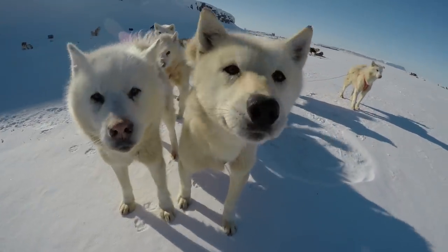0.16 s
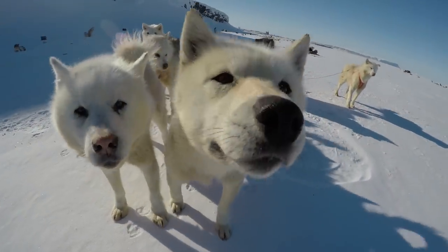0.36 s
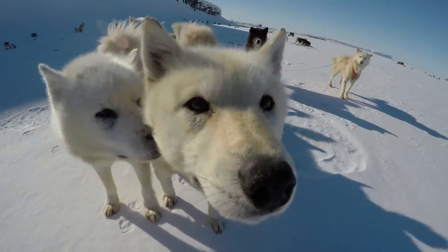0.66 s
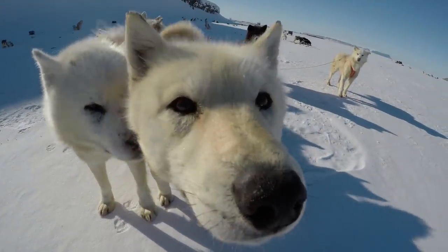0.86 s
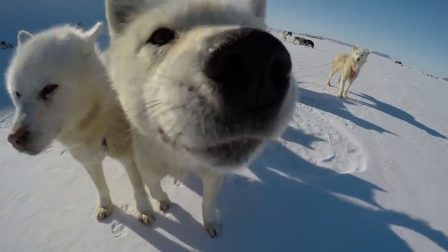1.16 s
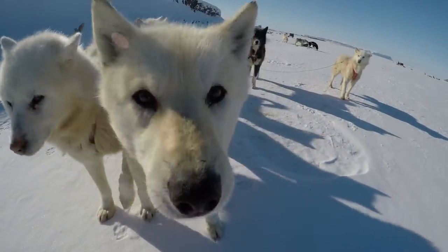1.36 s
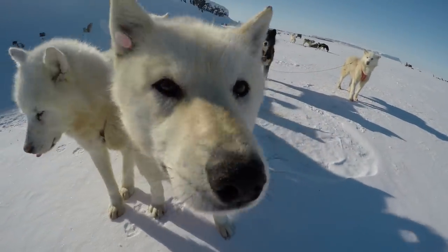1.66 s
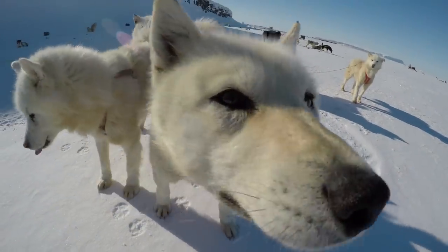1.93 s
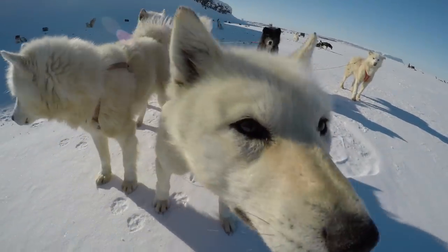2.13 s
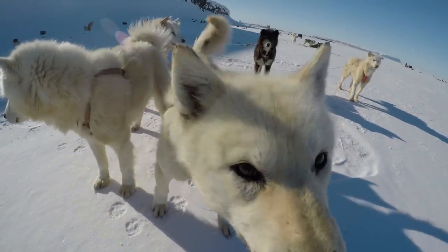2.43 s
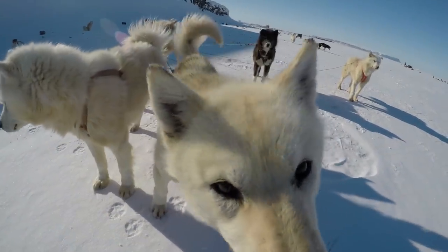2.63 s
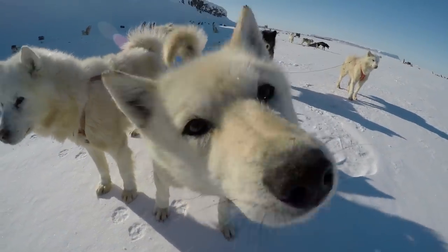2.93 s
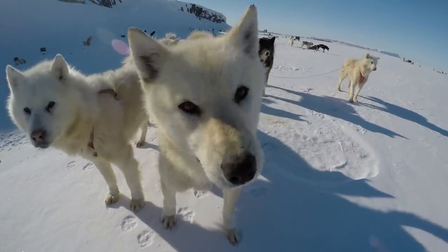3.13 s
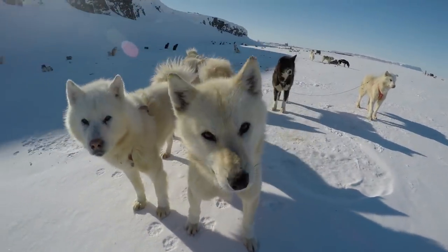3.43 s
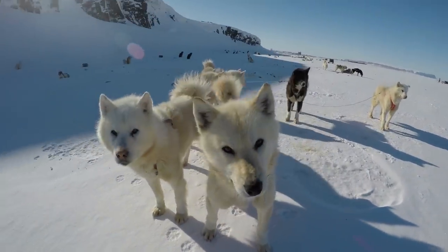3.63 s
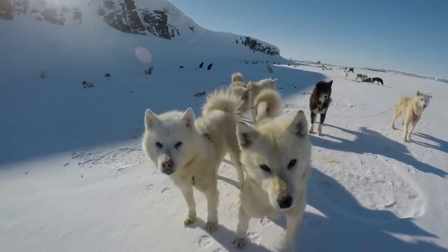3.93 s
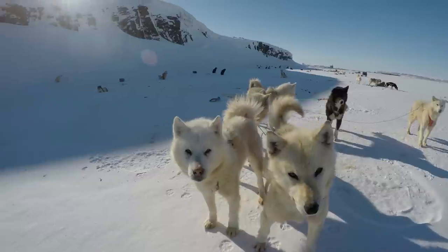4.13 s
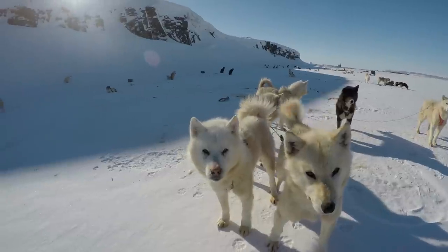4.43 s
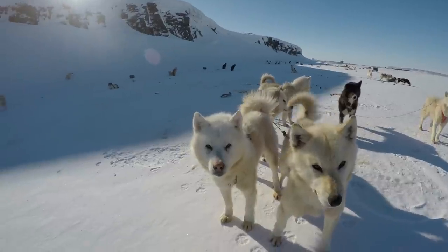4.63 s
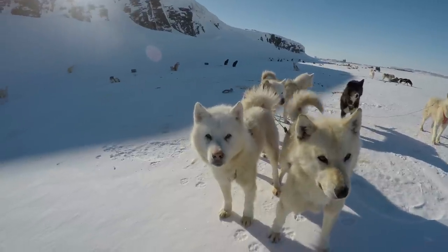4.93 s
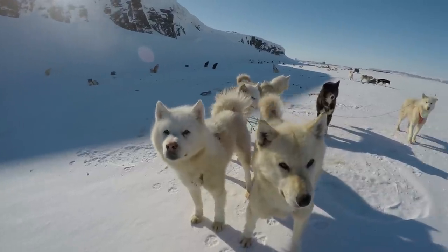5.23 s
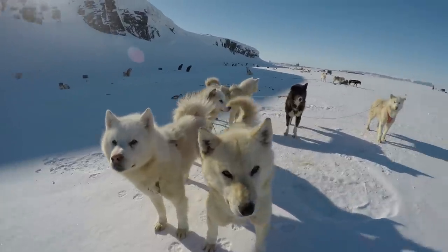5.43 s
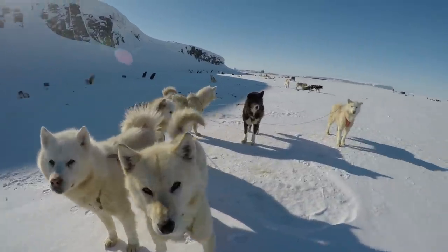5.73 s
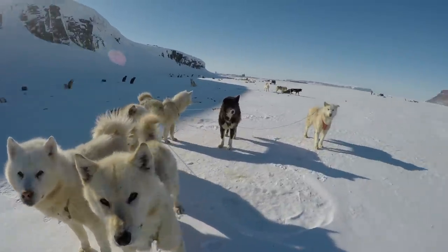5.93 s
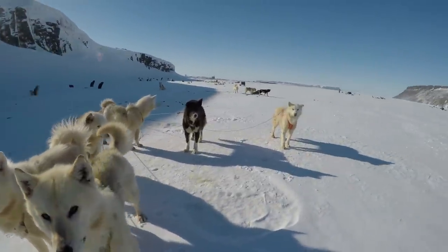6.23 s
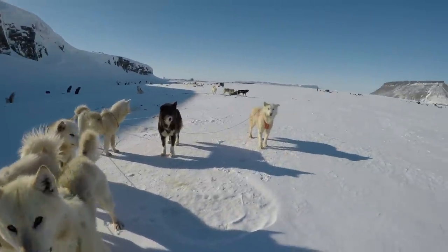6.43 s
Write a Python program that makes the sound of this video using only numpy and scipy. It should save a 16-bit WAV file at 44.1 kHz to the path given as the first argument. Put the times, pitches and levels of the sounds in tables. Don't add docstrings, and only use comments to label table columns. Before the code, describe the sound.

Outdoors on snowy ice, a dog gives clear whining calls and panting puffs while a handheld pole is bumped, knocked and creaks.

```python
import sys
import numpy as np
from scipy import signal
from scipy.fft import rfft, irfft
from scipy.io import wavfile
from scipy.ndimage import uniform_filter1d

SR = 44100
rng = np.random.default_rng(int(sys.argv[2]) if len(sys.argv) > 2 else 0)


def volts_from_db(level):
    exponent = np.asarray(level, float) / 20
    return 10 ** exponent


def generate_wav(sig):
    pcm = np.round(np.clip(np.atleast_2d(sig).T, -1, 1) * 32767).astype(np.int16)
    wavfile.write(sys.argv[1], SR, pcm)


N = 290619
T = np.arange(N) / SR

# time_s, pitch_hz, fundamental_db, overtones_db
CALL_TAIL = [(0.0, 1076, -44, -47), (0.02, 780, -44, -51), (0.04, 635, -40, -49)]
WHINE_1 = [(0.561, 950, -54.5, -75), (0.581, 1146, -29.5, -49.5), (0.627, 1334, -20, -42),
           (0.729, 1290, -22.5, -48), (0.83, 1415, -18, -40.5), (0.93, 1394, -18.5, -39.5),
           (1, 1380, -16.5, -41), (1.06, 1331, -20, -45), (1.077, 1216, -28, -52.5)]
YELP = [(1.272, 430.4, -45, -48), (1.305, 510.3, -31, -48.5), (1.332, 600, -42, -39.5),
        (1.352, 933, -36.5, -49.5), (1.401, 889.7, -40.5, -61.5), (1.421, 614.5, -42.5, -46.5),
        (1.45, 447, -45, -55), (1.58, 300, -51, -62)]
WHINE_2 = [(4.71, 759, -54, -72), (4.75, 1183, -28, -43.5), (4.775, 1248, -21, -52),
           (4.8, 1320, -21.5, -53), (4.9, 1332, -27, -58), (4.98, 1449, -22.5, -57.5),
           (5.15, 1429, -28.5, -57.5), (5.19, 1386, -35.5, -56), (5.25, 1363, -35, -53.5)]
WHINE_3 = [(5.454, 603, -67, -59), (5.495, 1048, -39, -64), (5.52, 1246, -28, -56),
           (5.551, 1346, -27, -55.5), (5.644, 1284, -33.5, -59.5), (5.72, 1375, -22, -56),
           (5.848, 1378, -21.5, -52), (5.961, 1180, -38.5, -57.5), (5.978, 1021, -47, -50)]
WHINE_4 = [(6.209, 553, -54, -63), (6.25, 900.2, -49, -50.5), (6.271, 1106, -50.5, -46),
           (6.301, 1213, -45.5, -37), (6.329, 1157, -53, -47.5), (6.4, 1026, -54, -56),
           (6.48, 1103, -39.5, -49), (6.555, 1191, -33, -50), (6.588, 1151, -33.5, -46)]
CALLER = [
    1,
    0,
    1,
    0,
    0,
    1,
]
# partial_2_db, partial_3_db, partial_4_db, higher_partials_db, breath_db
CALL_COLOURS = [
    (-1.5, -22, -6, -4, 3.5),
    (2.5, 2, -0.5, -7, -4),
    (1.5, -3.5, -2.5, -10.5, 1.5),
    (0, 6, 4.5, 2, -16.5),
    (-2, -1, 1, -4.5, -4.5),
    (3, -3, -4.5, -5, -6.5),
]
# length_s, fundamental_db, overtones_db, end_pitch_share, fade_db
VOICE_BREAKS = [
    (.03, -45, -47, .25, 2),
    (.03, -46.5, -63, .42, -1.5),
    (.04, -49, -50.5, .3, -3),
]
# centre_s, half_width_s, roughness (0-1)
FLUTTER = [(1.092, .02, .25), (1.335, .024, .55), (1.45, .03, .1), (1.5, .09, .07), (4.73, .04, .08),
           (5.268, .028, .3), (5.47, .035, .06), (5.61, .06, .025), (6.008, .03, .55), (6.222, .04, .28)]
# centre_s, half_width_s, level_db
SWELLS = [(0.655, .03, 1.5), (0.72, .045, -2.5), (0.775, .03, 2), (4.86, .04, -2), (5.005, .03, 1),
          (5.068, .025, -4), (5.1, .03, 1), (5.205, .025, -2), (5.275, .008, 5), (5.605, .03, -3),
          (5.77, .04, 1), (5.9, .03, -3), (5.986, .008, 9.5), (6.001, 0.011, -12), (1.328, 0.014, -5),
          (1.074, .01, 3), (1.088, .006, -8), (6.29, .012, -7), (6.335, .012, -9), (6.52, .04, 2.5)]
# centre_s, half_width_s, level_db
TONGUE_SHIFTS = [
    [(0.70, 0.072, -4.5), (1.32, .022, 6), (1.37, .03, 3), (1.41, 0.014, 5), (1.49, 0.061, -6),
     (4.86, .05, -8), (4.95, .06, -4), (5.06, 0.026, -12), (5.22, 0.016, -3), (5.475, .02, 7.5),
     (5.54, 0.026, -12), (5.575, .03, -6), (5.63, 0.026, -9.5), (5.70, 0.042, -7.5), (5.983, 0.0078, 6.5),
     (6.345, 0.02, -9), (6.52, 0.1, -2), (6.235, .015, 2), (6.3, .03, 3), (6.41, 0.057, 4),
     (6.58, 0.031, -9)],
    [(0.68, 0.16, -10), (1.341, .016, 9), (1.375, 0.028, -12), (1.43, .02, 6.5), (4.77, 0.025, 6),
     (4.86, .05, -1), (5.47, 0.044, -21), (5.55, .03, -9), (5.68, 0.048, 7.5), (5.965, 0.04, -14.5),
     (5.996, .008, 11), (6.3, 0.056, -13), (6.41, 0.046, -11), (6.53, 0.074, 10)],
    [(0.6, .03, 6.5), (0.93, .1, 0), (1.28, 0.022, -14.5), (1.375, 0.024, 5), (1.3, .015, 8),
     (1.43, .02, 5), (1.505, .035, -8), (1.46, .025, 3), (4.76, 0.013, 5.5), (4.80, 0.033, -16),
     (5.235, .035, -13), (5.465, .02, -15), (5.56, 0.049, 8.5), (5.84, 0.052, -18), (5.96, 0.029, 7),
     (5.987, 0.013, -17), (6.005, .012, 10), (6.31, .04, 1.5), (6.405, 0.046, -17), (6.53, .06, 6)],
    [(0.62, 0.042, 6.5), (0.9, 0.26, -8.5), (1.375, .035, 19), (1.46, .035, 5), (4.83, 0.12, 13.5),
     (5.47, 0.029, -10), (5.925, .03, 0), (6.01, 0.023, 10), (6.31, 0.041, 12), (6.41, 0.065, -9),
     (6.545, .055, 13)],
    [(0.74, 0.11, 10), (0.9, 0.085, -7), (1.03, 0.047, 7.5), (6.015, 0.021, 14.5), (6.3, 0.069, -14),
     (6.41, 0.043, 9), (6.54, .07, -14)],
]
# frequency_hz, level_db
MOUTH = [(1000, -1), (1600, 11.5), (2700, -1.5), (3900, -4.5), (4250, -4.5), (5200, -7.5), (6300, -20),
         (8200, -28)]
PORT_LEAD = [
    (0.86, -1.5, .1, 2.1),
    (-1, 4, -1.7, 2.4),
]
# partial_1_db, partial_2_db, partial_3_db, partial_4_db
PORT_PAN = [
    (8, 4, 5.7, 1),
    (12, 8.2, 15, 11),
]
# centre_s, half_width_s, lead_rad, pan_db
HEAD_TURN = (4.5, -0.5, 0.5, -1)

# delay_s, level_db
CLIFF_FACES = [(0.076, -26.5), (0.117, -28), (.15, -29.5), (.18, -34)]
# time_s, level_db
FACING = [(0, -2.5), (1.2, -9), (1.5, -7), (4.85, -12), (5.1, 1.5), (5.3, 9), (5.58, 9), (5.8, -6),
          (6.1, -1), (6.5, 7.5)]

# start_s, length_s, first_hz, last_hz, peak_db
WHISTLES = [(0.031, 0.016, 4850, 4850, -36), (0.033, 0.053, 4150, 4410, -42.5),
            (0.058, 0.055, 4900, 4960, -54), (0.539, 0.021, 4360, 4350, -48),
            (1.086, 0.0297, 4430, 4630, -39.5), (1.175, .028, 600, 450, -45),
            (1.38, 0.0467, 479.7, 610, -38.5), (4.09, .045, 4300, 4330, -64),
            (4.435, .035, 4800, 4800, -53.5), (4.428, .03, 4060, 4150, -60), (5.558, .035, 880, 1025, -54),
            (5.601, .055, 1083, 1187, -47.5), (5.979, 0.017, 4360, 4850, -48),
            (6.027, 0.0149, 4850, 5000, -55)]
# time_s, pitch_hz, level_db
LONG_WHISTLE = [
    [(3.85, 4992, -67), (3.9, 4873, -67), (3.94, 4772, -63), (3.962, 4700, -50), (3.99, 4800, -67),
     (4.015, 4880, -68), (4.06, 4790, -70)],
    [(4.08, 4800, -66), (4.12, 4840, -67), (4.155, 4770, -56), (4.19, 4820, -67), (4.215, 4750, -62),
     (4.28, 4620, -58), (4.36, 4570, -62.5), (4.385, 4534, -44), (4.432, 4390, -54)],
]

# start_s, peak_s, end_s, hiss_db, throat_re_hiss_db
PANTS = [(0.01, 0.087, 0.2, -42.5, 5.5), (0.157, 0.246, 0.36, -47.5, -3), (1.07, 1.089, 1.164, -46, -9.5),
         (1.145, 1.18, 1.28, -40.5, -2.5), (1.294, 1.335, 1.546, -44.5, -0.5), (1.41, 1.483, 1.54, -44, -7),
         (1.625, 1.646, 1.75, -55.5, -2.5), (1.71, 1.834, 1.95, -53, 0.5), (1.988, 2.008, 2.1, -47.5, -7),
         (3.065, 3.095, 3.13, -55, -1.5), (3.16, 3.212, 3.26, -56.5, -4), (4.403, 4.41, 4.52, -66, 9.5),
         (4.662, 4.755, 4.895, -48, 0), (5.986, 6.018, 6.02, -47, 5), (6.205, 6.232, 6.27, -62, 4)]
# time_s, level_db
CHEST_HUM = [
    [(0.0, -46), (0.13, -46), (0.27, -44)],
]
# frequency_hz, width_hz, level_db
HISS = [(4480, 1400, 22.5), (2860, 640, 16.5), (7000, 5700, -22)]
THROAT = [(1720, 1400, 14.5), (2420, 1100, 9)]
CHEST = [(597, 100, 6), (1040, 1570, -8), (358, 110, 2.5)]
# frequency_hz, width_hz, level_db
SNORT = (4200, 5100, -48)

# time_s, peak_db
THUMPS = [(0.331, -28.5), (0.633, -32.5), (0.769, -38), (0.868, -40), (1.209, -33), (1.315, -36.5),
          (1.534, -29.5), (1.923, -30.5), (2.069, -37), (2.145, -32), (2.662, -41.5), (2.962, -35.5),
          (3.09, -40), (3.175, -35.5), (3.216, -44), (3.331, -39.5), (3.564, -37), (3.602, -36),
          (3.655, -34), (4.084, -36.5), (4.436, -30.5), (4.519, -28.5), (4.664, -34), (4.838, -34.5),
          (5.497, -26.5), (5.777, -30), (6.21, -40), (6.232, -44), (6.323, -40.5), (6.556, -26),
          (5.287, -33), (0.442, -46), (1.696, -45.5), (2.09, -43), (2.229, -45), (2.627, -45), (2.74, -46),
          (3.03, -45), (4.393, -43), (4.545, -38), (4.608, -47), (4.7, -40), (5.72, -43.5), (6.03, -45),
          (6.39, -45), (6.535, -39)]
# time_s, peak_db
TAPS = [(0.533, -35.5), (0.573, -35), (0.631, -26.5), (0.739, -41.5), (0.769, -41.5), (1.206, -28),
        (1.532, -28.5), (2.143, -27.5), (0.329, -22.5), (1.921, -40), (1.995, -44), (2.07, -45),
        (2.17, -42), (2.96, -44.5), (3.39, -46), (4.517, -40.5)]
# frequency_hz, level_db, t60_s
POLE_MODES = [(179, 20, 0.08), (132, -9.5, 0.069), (267, -10.5, 0.095), (555, -30.5, 0.11)]
GRIP_MODES = [(255.6, 9.5, 0.044), (218, 0, 0.067), (314, -8.5, 0.041), (545, -18.5, 0.03)]
KNOCK_MODES = [(172.3, 20, 0.095), (139, 13, 0.042), (264, -12, 0.079), (520, -21, 0.046)]
RAP_MODES = [(1080, 0, 0.017), (1570, -4, 0.013), (520, -2, .015), (2900, -18, 0.0077), (4600, -29, .006),
             (201, -5, .025)]

# time_s, peak_db, bright_re_peak_db
SLIPS = [(0.058, -36, -18), (0.15, -35, -21), (0.326, -39.5, -11), (0.529, -43, -18), (0.569, -41.5, -12),
         (0.627, -52.5, 0), (0.735, -52.5, -11), (0.767, -42, -11), (1.251, -39, -11.5),
         (1.767, -46, -11.5), (1.827, -43, -35), (2.141, -50, -8.5)]
# time_s, peak_db, bright_re_peak_db
CREAKS = [(3.247, -46.5, -22), (3.418, -41.5, -18), (3.517, -43.5, -10.5), (3.568, -41.5, -14.5),
          (3.652, -39.5, -43), (3.69, -54, -16), (3.719, -39, -42), (3.759, -39.5, -11.5), (3.793, -61, -3),
          (3.814, -37.5, -18), (3.846, -58, -5), (3.872, -40, -14), (3.902, -55, -2.5), (3.943, -40, -13.5),
          (3.978, -50.5, -7), (4.007, -51, -2.5), (4.043, -44.5, -8), (4.082, -49.5, -6.5),
          (4.142, -47.5, -13.5), (4.238, -38, -8.5), (4.661, -59, -15), (5.49, -41.5, -15),
          (5.772, -46.5, -12), (5.822, -57, -15), (6.552, -47.5, -20), (6.142, -50, -7), (6.228, -42, -8)]
# time_s, peak_db, pitch_hz
CRACKS = [(0.4678, -41.5, 4040), (0.5117, -42.5, 4570), (1.1725, -26.5, 3902), (1.481, -31.5, 5137),
          (1.642, -38, 5200), (1.735, -42.5, 4460), (1.8974, -45, 4730), (1.9969, -36, 4450),
          (2.946, -43, 5440), (3.064, -38, 5400), (3.0997, -47, 5460), (3.128, -34.5, 5395),
          (3.1496, -34, 4500), (3.46, -45, 3100), (4.4252, -50, 4570), (0.024, -35, 895),
          (0.058, -22.5, 620), (0.151, -26.5, 520), (0.698, -45.5, 4300), (0.748, -34, 4600),
          (3.0682, -38, 4485), (3.166, -45, 4200), (1.252, -35, 1120), (1.254, -42, 1750),
          (3.1295, -40, 5000), (3.093, -49, 4810), (3.203, -50, 3500), (3.212, -49, 4070),
          (5.496, -41, 802), (0.0235, -39, 1500)]
# time_s, level_db
TREMOR = [(0.0, -49.5), (0.3, -56), (0.6, -55.5), (1.3, -53), (1.7, -55.5), (2.3, -56.5), (2.68, -54.5),
          (3.1, -55), (3.54, -51.5), (3.9, -54), (4.3, -56.5), (4.55, -52.5), (4.99, -55), (5.6, -55.5),
          (5.9, -56.5), (6.17, -57.5), (6.4, -51), (6.59, -44)]

# frequency_hz, density_db (per Hz)
AIR_MID = [(12, -47.5), (20, -10), (43, -14.5), (87, -21.5), (188, -4.5), (235, -4), (420, -11.5),
           (636, -15), (1240, -19.5), (1380, -18.5), (2340, -23), (3170, -24.5), (8820, -28), (12000, -33),
           (14900, -46.5)]
AIR_SIDE = [(12, -71.5), (20, -33.5), (87, -38), (124, -16.5), (151, -4.5), (554, -8), (912, -7.5),
            (1020, -8), (4420, -33.5), (5510, -26.5), (9860, -30), (12600, -36.5), (14900, -47.5)]
# centre_s, half_width_s, level_db
LULL = (2.55, 0.53, -1.8)

STEADY_ROUGH, SLACK_ROUGH = .004, .07
SLACK_HZ, SLACK_SPAN_HZ = 1000, 700
SLACK_LOSS_DB = -34.5
BREATH_DB = -10
PATCHY_DB = 3.4
BREAK_KNEE, BREAK_KNEE_DROP = .3, .5
CLIFF_S, CLIFF_SPREAD_S, CLIFF_DB = .12, .05, -23
WHISTLE_EDGE_DB = -8.5
PANT_START_DB, PANT_END_DB = -9, -13
SNORT_S, SNORT_HALF_S = 4.755, 0.15
KNOCK_S, KNOCK_DB = 5.297, -11
RAP_S, RAP_DB = 5.2945, -7.5
TICK_HZ, TICK_CYCLES, TICK_WIDTH = 2800, 2.4, .9
SNAP_CYCLES, SNAP_WIDTH = 3.6, 0.47
AIR_DB, SIDE_DB = -54, -50.5
LOW_CUT_HZ, CUT_HZ = 138, 15080
LEAK_HZ, LEAK_DB = 70, -16.5


def set_level(x, db=0):
    return x * volts_from_db(db) / np.sqrt(np.mean(x ** 2))


def bump(centre_s, half_s):
    out = np.zeros(N)
    span = slice(*np.searchsorted(T, [centre_s - abs(half_s), centre_s + abs(half_s)]))
    out[span] = np.cos(np.pi / 2 * (T[span] - centre_s) / half_s) ** 2
    return out


def curve(points):
    return volts_from_db(np.interp(T, *np.transpose(points)))


def play(tables, edge_s=.008):
    s, *columns = np.concatenate([np.array(t, float) for t in tables]).T
    edge = int(edge_s * SR)
    is_open = sum(((T >= t[0][0]) & (T <= t[-1][0])) * 1. for t in tables).clip(0, 1)
    smooth = [uniform_filter1d(np.interp(T, s, c), edge) for c in columns]
    return smooth, uniform_filter1d(is_open, edge)


def walk(rate):
    hold = int(SR / rate)
    steps = np.repeat(rng.standard_normal(N // hold + 1), hold)
    return set_level(uniform_filter1d(uniform_filter1d(steps, hold), hold)[:N])


def band(x, hz, width):
    return signal.lfilter(*signal.iirpeak(hz, hz / width, SR), x)


def body(x, modes):
    return set_level(sum(volts_from_db(db) * band(band(x, hz, w), hz, w) for hz, w, db in modes))


def coloured(points):
    hz, db = np.transpose(points)
    f = np.maximum(np.fft.rfftfreq(N, 1 / SR), 1)
    gain = volts_from_db(np.interp(np.log(f), np.log(hz), db))
    return set_level(irfft(rfft(rng.standard_normal(N)) * gain, N))


def strike(seconds, gains, kernel):
    train = np.zeros(N)
    np.add.at(train, (np.asarray(seconds) * SR).astype(int).clip(0, N - 1), gains)
    return signal.fftconvolve(train, kernel / np.abs(kernel).max())[:N]


def mid_side(mid, side):
    return mid + side * np.array([[1], [-1]])


def ports(phase, rms_db, pan_db, lead):
    left, right = volts_from_db(pan_db / 2), volts_from_db(-pan_db / 2)
    mean = np.maximum(np.sqrt(left ** 2 + right ** 2 + 2 * np.cos(lead)) / 2, .3)
    waves = np.array([left * np.sin(phase + lead / 2), right * np.sin(phase - lead / 2)])
    return np.sqrt(2) * volts_from_db(rms_db) / mean * waves


def broken(call, length_s, db, over_db, end_pitch, fade_db):
    s, hz = call[-1][:2]
    knee_hz = (1 - BREAK_KNEE_DROP * (1 - end_pitch)) * hz
    return call + [(s + BREAK_KNEE * length_s, knee_hz, db, over_db),
                   (s + length_s, end_pitch * hz, db + fade_db, over_db + fade_db)]


def fold_roughness(hz):
    slack = ((SLACK_HZ - hz) / SLACK_SPAN_HZ).clip(0, 1)
    return STEADY_ROUGH + SLACK_ROUGH * slack + sum(r * bump(s, w) for s, w, r in FLUTTER)


def fold_phase(hz, rough):
    return 2 * np.pi * np.cumsum(hz * (1 + 0.3785 * rough * walk(500))) / SR


def breath(over_db, breath_db):
    noise = rng.standard_normal((2, N))
    air_flow = body(noise, HISS) + volts_from_db(2.5) * body(noise, THROAT)
    air_flow = volts_from_db(over_db + BREATH_DB + breath_db) * air_flow
    return mid_side(air_flow[0], .6 * air_flow[1])


def whines():
    whole = (WHINE_1, WHINE_2, WHINE_3)
    first, second, third = (broken(c, *b) for c, b in zip(whole, VOICE_BREAKS))
    calls = [CALL_TAIL, first, YELP, second, third, WHINE_4]
    (hz, first_db, over_db), gate = play(calls)
    call = (np.searchsorted([c[0][0] - .01 for c in calls], T) - 1).clip(0)
    dog = np.array(CALLER)[call]
    colour_db = np.transpose(CALL_COLOURS)[:, call]
    rough = fold_roughness(hz)
    hz = hz + (uniform_filter1d(hz, int(.035 * SR)) - hz) * np.exp(-rough / .015)
    phase = fold_phase(hz, rough)
    mouth_hz, mouth_db = np.transpose(MOUTH)
    turn = bump(*HEAD_TURN[:2])
    tongue_db = [sum(db * bump(s, w) for s, w, db in moves) for moves in TONGUE_SHIFTS]
    out = 0
    for k in range(7):
        shimmer_db = (.4 + 1.7 * min(k, 2)) * walk(35) + 8 * rough * walk(300) + .15 * walk(1000)
        lead, pan = (np.transpose(table)[min(k, 3)][dog] for table in (PORT_LEAD, PORT_PAN))
        if k:
            db = over_db + colour_db[min(k, 4) - 1] + tongue_db[min(k, 5) - 1]
            db = db + np.interp(np.log((k + 1) * hz), np.log(mouth_hz), mouth_db)
            db = db + SLACK_LOSS_DB * rough * (k - 1) + PATCHY_DB * walk(16)
        else:
            db = first_db + sum(swell * bump(s, w) for s, w, swell in SWELLS)
            lead = lead + HEAD_TURN[2] * turn
            pan = pan + HEAD_TURN[3] * turn
        out = out + ports((k + 1) * phase, db + shimmer_db, pan, lead)
    return (out + breath(over_db, colour_db[-1])) * gate


def cliff(voices, count=40):
    chance = rng.standard_normal((2, count, 2))
    dull = band(band(voices.mean(axis=0), 1400, 1800), 1400, 1800)
    out = []
    for c in chance:
        delays_s = np.abs(CLIFF_S + CLIFF_SPREAD_S * c[:, 0])
        facets = strike(delays_s, c[:, 1] / np.sqrt(count), np.ones(1))[:SR // 2]
        out.append(signal.fftconvolve(dull, facets)[:N])
    out = volts_from_db(CLIFF_DB) * np.array(out)
    for delay_s, db in CLIFF_FACES:
        late = np.interp(T - delay_s - .00015 * walk(70), T, dull, left=0)
        out = out + volts_from_db(db + 5.0 * np.array([walk(22), walk(12)])) * late
    return out * curve(FACING)


def whistles():
    short = []
    for s, length, a, b, db in WHISTLES:
        edge_db = db + WHISTLE_EDGE_DB
        short.append([(s, a, edge_db), (s + length / 2, (a + b) / 2, db), (s + length, b, edge_db)])
    wobble = 1 + .003 * walk(150)
    flicker_db = 1.5 * walk(60)
    out = 0
    for tables in (short[::2], sorted(short[1::2] + LONG_WHISTLE)):
        (hz, db), gate = play(tables)
        phase = 2 * np.pi * np.cumsum(hz * wobble) / SR
        out = out + gate * ports(phase, db + flicker_db, 3.0, .5)
    return out


def scuffing():
    puffs = [[(a, db + PANT_START_DB, throat), (peak, db, throat), (b, db + PANT_END_DB, throat)]
             for a, peak, b, db, throat in PANTS]
    (hiss_db, throat_db), gate = play(puffs, edge_s=.018)
    (chest_db,), hum = play(CHEST_HUM, edge_s=0.028)

    def grains():
        x = rng.standard_normal(N) * volts_from_db(2.2 * walk(400) + 1.2 * walk(60))
        puff = gate * volts_from_db(hiss_db) * (body(x, HISS) + volts_from_db(throat_db) * body(x, THROAT))
        return puff + hum * volts_from_db(chest_db) * body(x, CHEST)

    near, other = grains(), grains()
    return np.array([volts_from_db(.5) * near + .35 * other, volts_from_db(-.5) * np.roll(near, 2) - .35 * other])


def snort():
    hz, width, db = SNORT
    rough = rng.standard_normal((2, N)) * volts_from_db(1.2 * walk(120))
    x = set_level(band(body(rough, [(hz, width, 0)]), hz, width), db)
    return bump(SNORT_S, SNORT_HALF_S) * mid_side(x[0], .5 * x[1])


def rings(t, modes):
    return [volts_from_db(db) * np.sin(2 * np.pi * hz * t) * np.exp(-np.log(1000) * t / t60) for hz, db, t60 in modes]


def thumps(s, db, modes):
    push = np.hanning(int(0.001 * SR))
    low, lower, upper, top = (np.convolve(r, push) for r in rings(T[:SR // 4], modes))
    slow = strike(s, volts_from_db(db), low - lower)
    fast = strike(s, volts_from_db(db - 6), upper + top)
    return slow + np.array([volts_from_db(-1.6) * fast, volts_from_db(1.6) * np.roll(fast, int(.0003 * SR))])


def pole_thumps():
    s, db = np.transpose(THUMPS)
    pushes = thumps(s - .004, db, POLE_MODES)
    knock = thumps([KNOCK_S], KNOCK_DB, KNOCK_MODES)
    return pushes + knock + thumps(*np.transpose(TAPS), GRIP_MODES)


def rap():
    t = T[:SR // 20]
    modes = rings(t, RAP_MODES)
    rise = 1 - np.exp(-t / 0.0011)
    left = strike([RAP_S], volts_from_db(RAP_DB), -rise * sum(modes))
    right = strike([RAP_S - .0004], volts_from_db(RAP_DB), -rise * (sum(modes) + .4 * modes[1]))
    return np.array([volts_from_db(2.0) * left, volts_from_db(-1.5) * right])


def bending(hz, width, travel_s, echo_s, echo, size=2048):
    f = np.fft.rfftfreq(size, 1 / SR) + 1
    shape = np.exp(-.5 * (np.log2(f / hz) / width) ** 2)
    shape = shape * (1 + echo * np.exp(-2j * np.pi * f * echo_s))
    return irfft(shape * np.exp(-2j * np.pi * travel_s * (2 * np.sqrt(1000 * f) - .45 * f)), size)


def creaks():
    s, db, bright_db = np.transpose(CREAKS + SLIPS)
    out = []
    for side, travel_s, echo_s in ((1, .0028, .0045), (-1, .00298, .004)):
        gain = volts_from_db(db + 13.0 + side * 0.95)
        dull = strike(s + 0.00078, gain, bending(349, 1.0, travel_s, echo_s, 0.086))
        front = side * bending(1250, 0.59, travel_s, 0.002204, 0.87)
        out.append(dull + strike(s + 0.001328, gain * volts_from_db(bright_db + 4.0), front))
    return np.array(out)


def cracks():
    t = T[:SR // 25]
    out = np.zeros(N + len(t))
    for s, db, hz in CRACKS:
        cycles, width = (TICK_CYCLES, TICK_WIDTH) if hz > TICK_HZ else (SNAP_CYCLES, SNAP_WIDTH)
        snap = rng.standard_normal(len(t)) * np.exp(-t * hz / cycles)
        snap = band(band(snap, hz, width * hz), hz, width * hz)
        out[int(s * SR):][:len(t)] += volts_from_db(db) * snap / np.abs(snap).max()
    return out[:N] * volts_from_db(np.array([[1.0], [-1.0]]))


def tremor():
    fits = rng.standard_normal((2, N)) * volts_from_db(2.2 * walk(22))
    modes = [(166.3, 47.0, 3.0), (250.0, 20, -9.0), (417, 220, -21.5)]  # frequency_hz, width_hz, level_db
    mid, side = (body(x, modes) for x in fits)
    return curve(TREMOR) * mid_side(mid, .35 * side)


def air():
    mid = coloured(AIR_MID) * volts_from_db(AIR_DB + .6 * walk(3))
    side = coloured(AIR_SIDE) * volts_from_db(SIDE_DB + .5 * walk(3))
    return mid_side(mid, side) * volts_from_db(LULL[2] * bump(*LULL[:2]))


def scene():
    voices = whines()
    pole = pole_thumps()
    dogs = voices + cliff(voices) + whistles() + scuffing() + snort()
    heard = dogs + pole + rap() + creaks() + cracks() + tremor()
    wind_filter = signal.cheby1(6, 1, LOW_CUT_HZ, "high", fs=SR, output="sos")
    leak_filter = signal.butter(4, LEAK_HZ, fs=SR, output="sos")
    leak = volts_from_db(LEAK_DB) * signal.sosfilt(leak_filter, pole)
    return signal.sosfilt(wind_filter, heard) + leak + air()


def band_limit(x):
    return signal.sosfilt(signal.butter(12, 15080, fs=SR, output="sos"), x)


def record(dry):
    low_pass = signal.ellip(10, .2, 70, CUT_HZ, fs=SR, output="sos")
    mix = signal.sosfilt(low_pass, dry)
    return band_limit(mix)


dry = scene()
out = record(dry)
generate_wav(out)
```